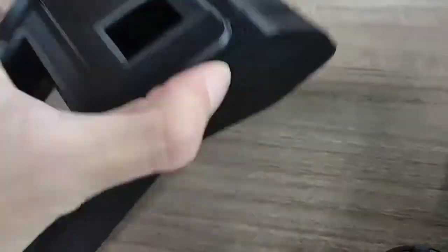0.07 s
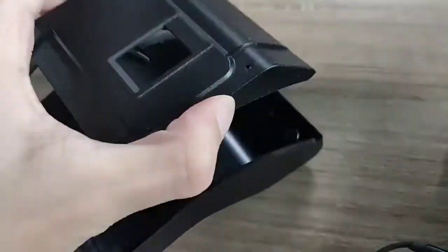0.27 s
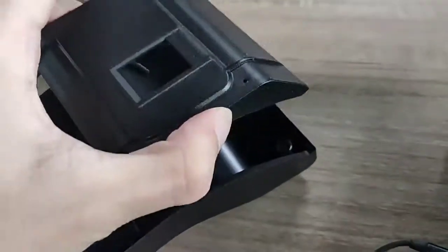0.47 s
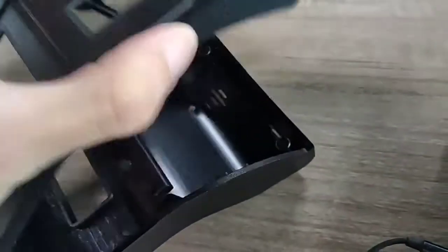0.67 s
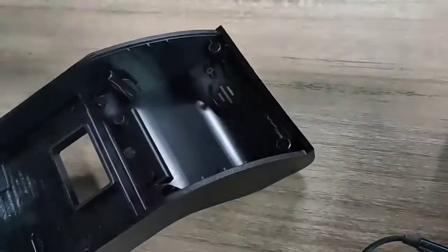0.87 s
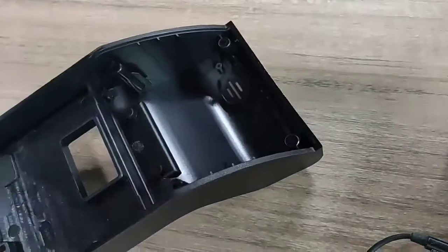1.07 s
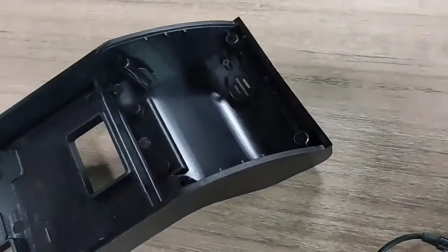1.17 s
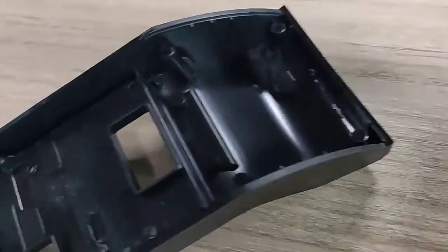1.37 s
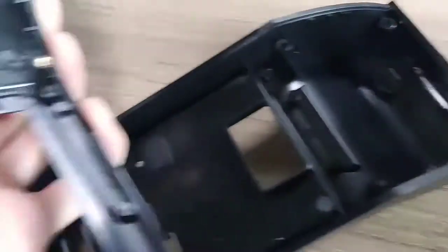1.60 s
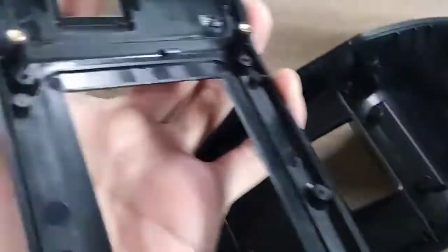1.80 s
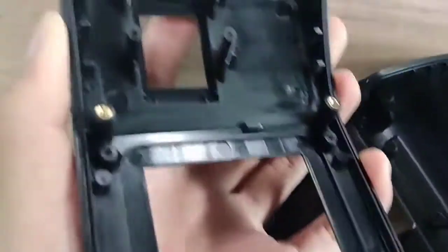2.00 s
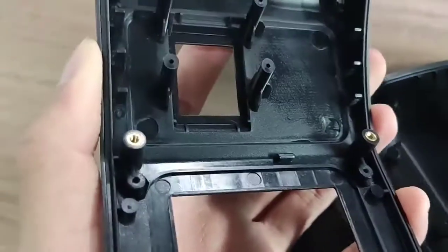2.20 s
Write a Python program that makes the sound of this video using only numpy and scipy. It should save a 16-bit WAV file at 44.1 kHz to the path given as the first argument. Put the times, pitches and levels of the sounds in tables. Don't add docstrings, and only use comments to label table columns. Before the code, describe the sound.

Plastic shell pried open on a table: quick ticks, loud snap, short rattle, echoing bare room.

```python
import sys
import numpy as np
from scipy import signal
from scipy.fft import rfft, irfft, next_fast_len
from scipy.io import wavfile
from scipy.ndimage import map_coordinates

SR = 44100
rng = np.random.default_rng(int(sys.argv[2]) if len(sys.argv) > 2 else 0)


def decibels_to_gain(level_db):
    exponent = np.asarray(level_db, float) / 20
    return 10 ** exponent


def unload_wav(signal):
    wavfile.write(
        sys.argv[1],
        SR,
        np.round(np.clip(np.atleast_2d(signal).T, -1, 1) * 32767).astype(np.int16),
    )


N = 99225

# f/Hz, width/Hz, level/dB
FREE_WALLS = [(266.5, 79, -16.5), (926, 182, -10.5), (1420, 80.5, 0.5), (2130, 220, -11.5),
              (2600, 390, -13.5), (3180, 770, -14.5), (4220, 970, -19)]
# f/Hz, level/dB
CLICK_COLOUR = [(700, -19), (1500, 5), (2500, 1), (4400, -4), (6000, -12.5), (11000, -24.5), (15600, -29)]


def unit(x):
    return x / np.sqrt(np.mean(x ** 2) + 1e-20)


def along(points, hz):
    f, v = np.transpose(points)
    return np.interp(np.log(hz + 1), np.log(f + 1), v)


def wobble(rate):
    return map_coordinates(rng.standard_normal(64), [np.arange(N) * np.clip(rate, 0, 25) / SR])


def filtered(x, response):
    n = x.shape[-1]
    padded = next_fast_len(n + SR // 4)
    hz = np.fft.rfftfreq(padded, 1 / SR)
    return irfft(rfft(x, padded) * response(hz), padded)[..., :n]


def coloured(noise, colour):
    return unit(filtered(noise, lambda hz: decibels_to_gain(along(colour, hz))))


def ringing(peaks):
    def response(f):
        total = 0
        for k, (centre, width, db) in enumerate(peaks):
            damping = 1j * f * width
            total = total + (-1) ** k * decibels_to_gain(db) * damping / (centre ** 2 - f ** 2 + damping)
        return total
    return response


def bump(t, centre, half):
    return np.exp(-((t - centre) / half) ** 2)


def diffuse(pair):
    # f/Hz, likeness/1
    likeness = [(60, 0.94), (180, 0.86), (550, 0.39), (1650, -0.15), (4970, 0.055), (15000, -0.16)]

    def mid_side(hz):
        turn = np.arccos(np.clip(along(likeness, hz), -1, 1)) / 2
        return np.array([np.cos(turn), np.sin(turn)])
    mid, side = filtered(pair, mid_side)
    return np.array([mid + side, mid - side])


def heard(x, wet_db):
    # f/Hz, t60/s
    room_decay = [(100, 1.2), (300, 2.39), (1000, 1.37), (1600, 1.38), (3500, 1.6), (7000, 1.004),
                  (14000, 0.82)]
    scatter_db, scatter_t60_s, right_lag_s = 3, 0.018, 0.0004
    gap_s, build_s = 0.004, 0.01
    t = np.arange(SR // 8) / SR
    near = diffuse(rng.standard_normal((2, len(t)))) * decibels_to_gain(-60 * t / scatter_t60_s)
    near = decibels_to_gain(scatter_db) * near / np.linalg.norm(near[0])
    near[[0, 1], [0, round(right_lag_s * SR)]] += 1

    hz, s, z = signal.stft(diffuse(rng.standard_normal((2, 2 * SR))), SR, nperseg=256)
    fade = decibels_to_gain(-60 * s / along(room_decay, hz)[:, None])
    tail = signal.istft(z * fade, SR, nperseg=256)[1]
    since_gap = np.maximum(np.arange(tail.shape[1]) / SR - gap_s, 0)
    tail = tail * (1 - np.exp(-since_gap / build_s))
    tail = decibels_to_gain(wet_db) * tail / np.linalg.norm(tail[0])
    tail[:, :len(t)] += near
    return signal.fftconvolve(x[None], tail, axes=1)


def hum():
    # f/Hz, level/dB
    air_colour = [(25, -11.5), (105, -4.5), (250, -6), (600, -18), (2800, -29), (5000, -36.5),
                  (8000, -44.5), (15500, -44.5)]
    # f/Hz, level/dB, wander/(1/s)
    machine_tones = [(101.8, -50, 7.94), (125, -52, 10), (252, -52, 3.58), (292, -58, 5), (201, -64, 9.1)]
    # t/s, half length/s, f/Hz, level/dB
    machine_swells = [(.8, 0.062, 310, -38), (1.27, 0.062, 247, -46), (1.636, 0.12, 220, -46),
                      (2.0, 0.022, 205, -42.5), (0.5, 0.28, 162, -39.5), (.1, 0.071, 290, -40),
                      (0.39, 0.12, 102, -39), (0.342, 0.027, 275, -28), (0.948, .04, 295, -42)]
    t = np.arange(N) / SR
    air = filtered(rng.standard_normal((2, N)), lambda hz: decibels_to_gain(along(air_colour, hz)))
    air = unit(diffuse(air)) * decibels_to_gain(-45.5 + 0.3 * wobble(3.8) + 0.8 * wobble(6.8))
    tones = np.zeros(N)
    for hz, db, rate in machine_tones:
        level = decibels_to_gain(db - 1) * wobble(rate)
        tones += level * np.sin(2 * np.pi * hz * t + 0.43 * wobble(rate))
    for s, half, hz, db in machine_swells:
        level = decibels_to_gain(db + 2.5) * bump(t, s, half)
        tones += level * np.sin(2 * np.pi * hz * t + 0.3 * wobble(17))
    return air + tones


def rustle():
    # t/s, half length/s, f/Hz, width/Hz, level/dB
    sweeps = [
        (1.8, 0.041, 1500, 1800, -55.5),
        (1.93, 0.24, 2400, 1360, -65),
        (2.13, 0.28, 6200, 600, -74.5),
        (1.09, 0.025, 2200, 2500, -65),
    ]
    t = np.arange(N) / SR
    out = np.zeros((2, N))
    for s, half, hz, width, db in sweeps:
        band = ringing([(hz, width, 0)])
        friction = unit(filtered(rng.standard_normal((2, N)), lambda f: band(f) ** 2))
        out += decibels_to_gain(db) * bump(t, s, half) * friction
    return out


def contacts(events, walls, colour, gain_db, thud_db, wet_db):
    # f/Hz, level/dB
    table_colour = [(29, -53), (50, -6.5), (235, -6), (269, -8.5), (420, 0.5), (900, -8), (1170, -33),
                    (1980, -120)]
    rise_s, thud_s, crack_rise_s = 0.0016, 0.019, 0.00026
    cavity_width_hz, cavity_db = 27, 1
    soft_hz = 3500
    out = np.zeros((2, N + 3 * SR))
    t = np.arange(SR // 10) / SR
    wall_response = ringing(walls)
    for s, db, hz, crack_db, length in events:
        noise = rng.standard_normal((4, len(t)))
        rise = 1 - np.exp(-t / rise_s)
        push = rise * np.exp(-t / length)
        drift = np.cumsum(noise[3]) * np.sqrt(2 * np.pi * cavity_width_hz / SR)
        cavity = decibels_to_gain(cavity_db) * np.sin(2 * np.pi * hz * t + drift) * push
        soft = filtered(noise[0] * push, lambda f: wall_response(f) / (1 + 1j * f / soft_hz) ** 2)
        ring = cavity + soft * np.linalg.norm(push) / np.linalg.norm(soft)
        crack = coloured(noise[1], colour) * np.exp(-1.5 * t / length) * np.minimum(t / crack_rise_s, 1)
        thud = coloured(noise[2], table_colour) * rise * np.exp(-t / thud_s)
        blow = 2 * ring + decibels_to_gain(crack_db) * crack + decibels_to_gain(thud_db) * thud
        sound = heard(decibels_to_gain(db + gain_db) * blow, wet_db)
        out[:, round(s * SR):][:, :sound.shape[1]] += sound
    return out[:, :N]


def settles():
    # t/s, peak/dB, cavity f/Hz, crack over ring/dB, contact length/s
    late_clicks = [
        (.672, -25, 1510, 5.5, 0.0067),
        (.9295, -28.5, 1762, 2.5, 0.015),
        (.969, -38.5, 1420, 7, 0.008),
    ]
    return contacts(late_clicks, FREE_WALLS, CLICK_COLOUR, gain_db=-7.5, thud_db=-21.5, wet_db=-30)


def slips(level_points, colour, wet_db):
    slips_per_s, scatter_db, gain_db = 9000, 1.5, -3
    s, db = np.transpose(level_points)
    t = np.arange(SR // 2) / SR
    happens = rng.random(len(t)) < slips_per_s / SR
    strength = rng.standard_normal(len(t)) * decibels_to_gain(scatter_db * rng.exponential(size=len(t)))
    level = decibels_to_gain(np.interp(t, s, db, left=-120, right=-120) + gain_db)
    return heard(coloured(happens * strength, colour) * level, wet_db)[:, :N]


def creak():
    # t/s, level/dB
    rub_level = [(0, -40), (.05, -43), (.07, -52), (.115, -37.5), (.162, -32), (.18, -39), (.208, -23.5),
                 (.243, -29.5)]
    # f/Hz, level/dB
    rub_colour = [(50, -25), (170, -9), (290, -4), (520, -9), (850, 1.5), (1500, -9), (2700, -13),
                  (3500, -21.5), (15500, -52.5)]
    return slips(rub_level, rub_colour, wet_db=-0.5)


def rattle():
    # t/s, level/dB
    chatter_level = [(.314, -59), (.32, -26.5), (.345, -18), (.368, -12.5), (.385, -28.5), (.41, -40)]
    # f/Hz, level/dB
    chatter_colour = [(150, -38), (400, -8.5), (1100, 0), (2500, -8.5), (4300, -12.5), (7000, -25),
                      (12500, -36), (15600, -45)]
    return slips(chatter_level, chatter_colour, wet_db=-2)


def ticks():
    # t/s, peak/dB, cavity f/Hz, crack over ring/dB, contact length/s
    rim_ticks = [
        (.052, -34.5, 866, -32.5, 0.017),
        (.131, -40, 2700, -30, .012),
        (.158, -27, 830, -25, .007),
        (.1895, -24, 1040, -16, .005),
        (.197, -20, 830, -23, 0.0057),
        (.2065, -16.5, 900, -7, 0.0059),
        (.2487, -8, 920, -10.5, .003),
        (.2695, -16, 1430, -9, .004),
    ]
    # f/Hz, width/Hz, level/dB
    shut_walls = [(292, 32, 5), (794, 140, 1), (1430, 140, 2.5), (1880, 200, -4), (2600, 260, -14),
                  (2880, 190, -9.5), (3630, 130, -12.5)]
    return contacts(rim_ticks, shut_walls, CLICK_COLOUR, gain_db=-8, thud_db=-21.5, wet_db=-0.5)


def clacks():
    # t/s, peak/dB, cavity f/Hz, crack over ring/dB, contact length/s
    lid_clacks = [
        (.2955, -3, 1771, -36, 0.0077),
        (.3128, 0, 1714, -6.5, 0.002),
        (.333, -9.5, 1508, -14, .005),
        (.342, -12, 1420, -4, .005),
        (.352, -11, 1720, -26, .005),
        (.364, -10.5, 1716, -11.5, .006),
        (.384, -11, 1467, -36.5, .006),
    ]
    # f/Hz, level/dB
    crack_colour = [(1500, -25), (2800, -4), (4500, -5.5), (6500, -0.5), (8500, -6.5), (11000, -16),
                    (13500, -16), (15600, -40)]
    return contacts(lid_clacks, FREE_WALLS, crack_colour, gain_db=-7.5, thud_db=-18.5, wet_db=3)


def scene():
    lid = ticks() + clacks() + settles()
    friction = creak() + rattle() + rustle()
    lean_db = -0.6
    return (lid + friction + hum()) * decibels_to_gain([[lean_db], [-lean_db]])


def top_cut(x):
    return signal.sosfilt(signal.butter(12, 15730, fs=SR, output="sos"), x)


def record(dry):
    ceiling, knee, top_hz = 0.98, 6, 15400
    x = dry / (1 + np.abs(dry / ceiling) ** knee) ** (1 / knee)
    x = filtered(x, lambda hz: hz < top_hz)
    return top_cut(x)


dry = scene()
out = record(dry)
unload_wav(out)
```